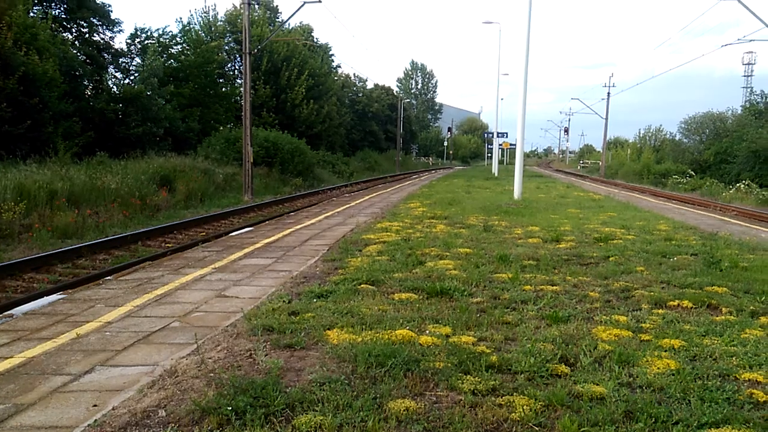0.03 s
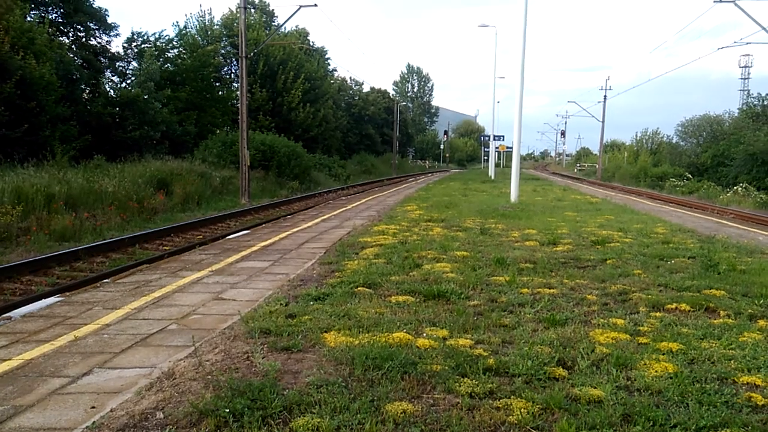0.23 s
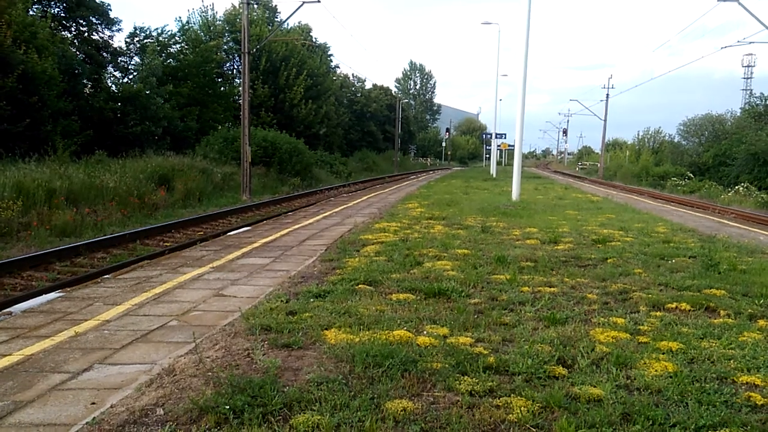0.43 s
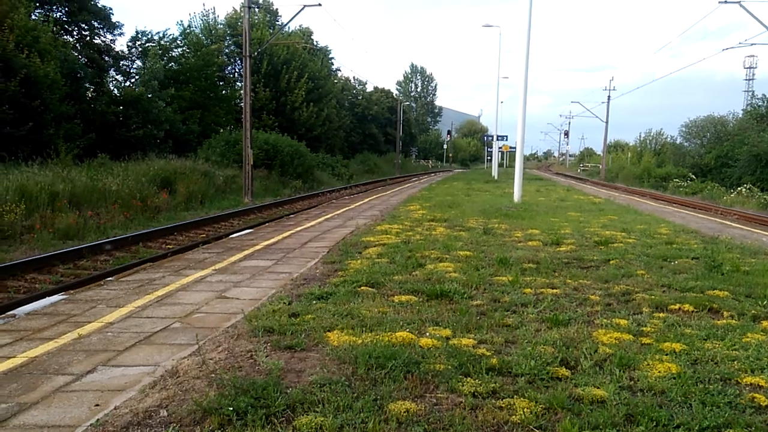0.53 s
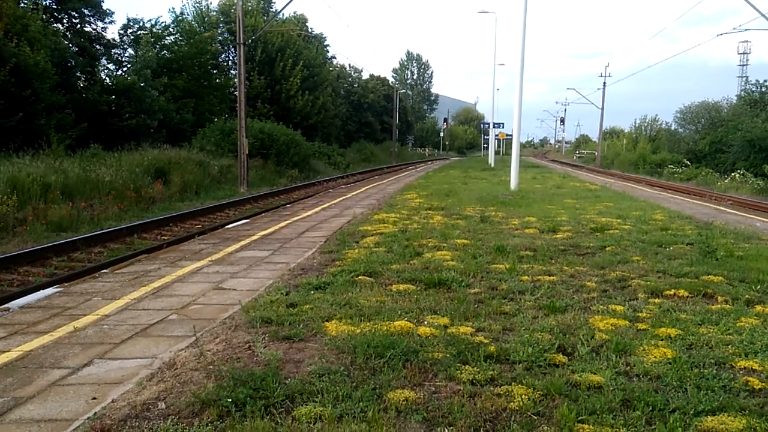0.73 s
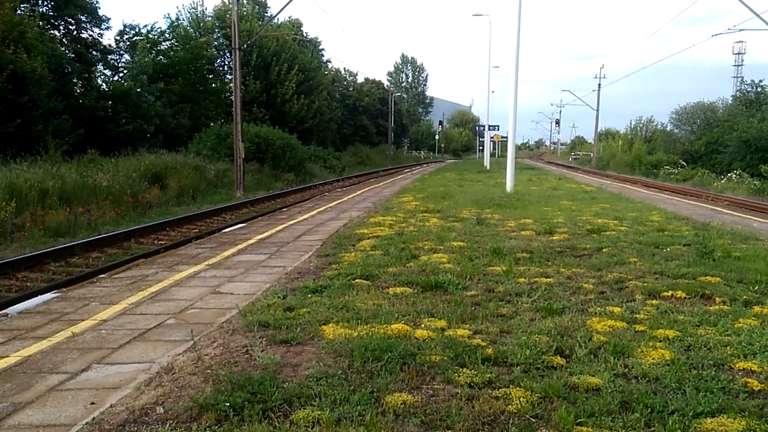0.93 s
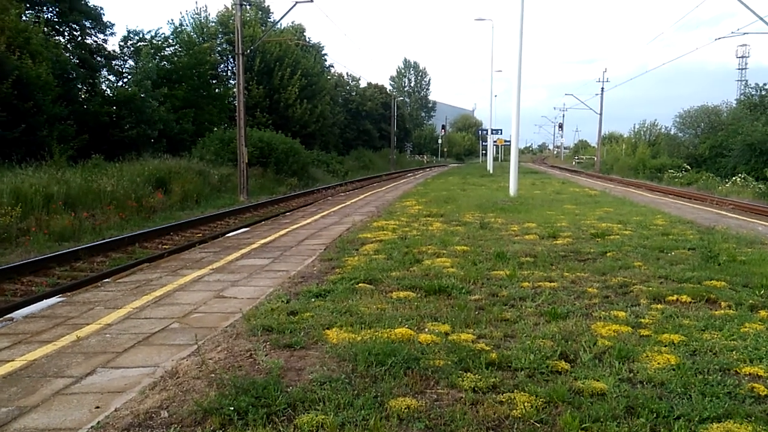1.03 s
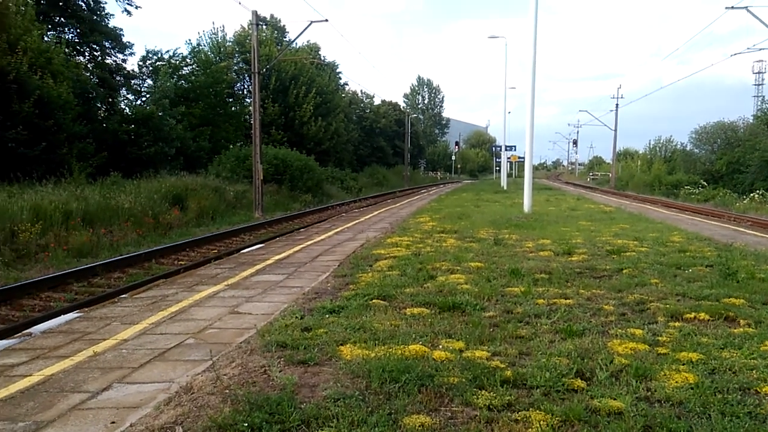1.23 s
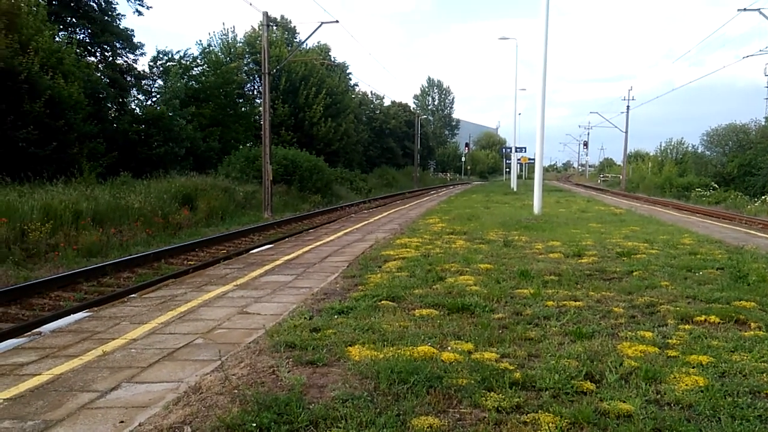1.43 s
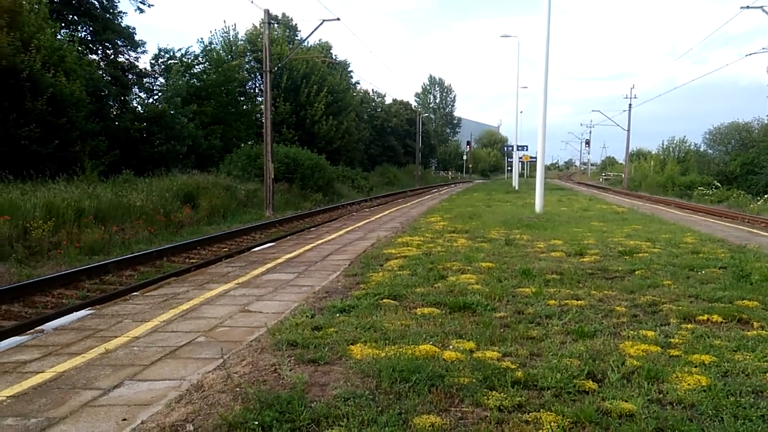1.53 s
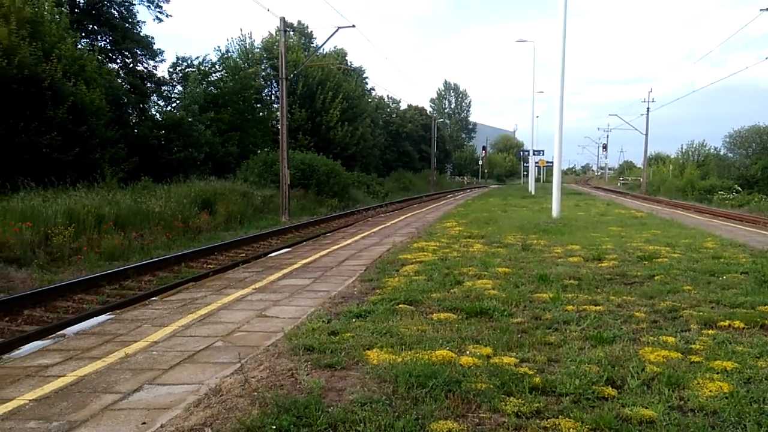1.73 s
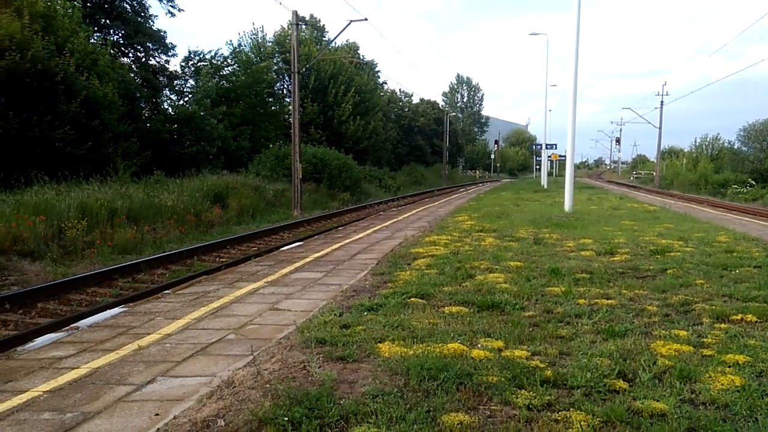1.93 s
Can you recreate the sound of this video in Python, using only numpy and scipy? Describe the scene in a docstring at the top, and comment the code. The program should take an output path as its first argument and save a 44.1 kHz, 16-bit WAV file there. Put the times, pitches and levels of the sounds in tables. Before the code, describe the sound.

From about 0.2 seconds a cricket chirps in rapid, high, scraping pulses, stopping near 1.2 seconds. Light wind buffets the microphone with low, uneven rumbles, easing after 1.5 seconds. Distant insects shrill and small birds give faint, brief whistles over a soft outdoor rush. A few faint ticks sound close by between 1.4 and 1.9 seconds, and another insect's buzz swells just before 2 seconds.

```python
"""On a country railway platform, light wind buffets the microphone over a faint distant rush.
From the start a cricket in the grass scrapes its wings together, fifteen strokes, while other
insects shrill further off and small birds whistle from the trees. The cricket pauses; a few faint
ticks sound close by, the birds call again, and at the very end one insect's buzz swells up."""
import sys
import numpy as np
from scipy import signal
from scipy.fft import rfft, irfft
from scipy.io import wavfile

SR = 44100
rng = np.random.default_rng(int(sys.argv[2]) if len(sys.argv) > 2 else 0)


def put_to_file(sound):
    """Save the sound as 16-bit audio at rate SR, in the file named by the first command-line argument."""
    columns = np.atleast_2d(sound).T  # one column per channel
    safe = np.clip(columns, -1, 1)
    whole_steps = np.round(safe * 32767)
    wavfile.write(sys.argv[1], SR, whole_steps.astype(np.int16))


N = 88200
TIME = np.arange(N) / SR


def from_db(db):
    """Decibels to gain."""
    return 10 ** (np.asarray(db) / 20)


def rms_one(x):
    """Scale to unit rms."""
    return x / np.sqrt(np.mean(x ** 2) + 1e-20)


def gains(rows):
    """One gain curve for each dB column of a table whose rows begin with a time in seconds."""
    times, *columns = np.transpose(rows)
    return [from_db(np.interp(TIME, times, db)) for db in columns]


def colour(x, spectrum):
    """Equalise a sound by rows of frequency in Hz and gain in dB."""
    hz, db = np.transpose(spectrum)
    bin_hz = np.arange(N // 2 + 1) * SR / N
    return irfft(rfft(x) * from_db(np.interp(np.log(bin_hz + 1), np.log(hz), db)), N)


def noise(spectrum):
    """Noise of unit rms with the given spectrum."""
    return rms_one(colour(rng.standard_normal(N), spectrum))


def widen(mid, side):
    """Left and right from a middle and a side signal; only the treble is wide."""
    # Stereo width. Each row: frequency in Hz, side against middle in dB.
    width = [(500, -45), (2600, -38), (4000, -21), (6000, -10), (9000, -7), (14000, -6)]
    return mid + colour(side, width) * np.array([[1], [-1]])


def diffuse(spectrum):
    """Noise that reaches the microphone from all around."""
    return widen(noise(spectrum), noise(spectrum))


def scatter(x, t60):
    """A dying tail from many small reflections, 60 dB down after t60 seconds."""
    tail = rng.standard_normal(N) * from_db(-60 * TIME / t60) * (TIME > .004)
    return signal.fftconvolve(x, tail / np.sqrt(np.sum(tail ** 2)))[:N]


def resonate(x, hz, width_hz):
    """A resonance that passes white noise at unit power."""
    r = np.exp(-np.pi * width_hz / SR)
    feedback = [1, -2 * r * np.cos(2 * np.pi * hz / SR), r * r]
    return signal.lfilter(np.sqrt((1 - r * r) / 2) * np.array([1, 0, -1]), feedback, x)


def linger(energy, time_s):
    """Spread energy over an exponential decay."""
    r = np.exp(-1 / (time_s * SR))
    return signal.lfilter([1 - r], [1, -r], energy + 1e-24)


def air():
    """A distant rush, the hiss of leaves and the microphone's own even hiss."""
    # Background levels. Each row: time in seconds, rush in dB, leaves in dB.
    levels = [(0.22, -69, -75.5), (0.9, -70, -78.5), (1.0, -68, -72), (1.3, -69, -73), (1.46, -69.5, -76.5),
              (1.55, -76.5, -82), (1.66, -81, -95), (1.9, -79, -92), (2.0, -80.5, -80)]
    # Spectra of the rush and the leaves. Each row: frequency in Hz, relative level in dB.
    rush_spectrum = [(100, -8), (300, -0.5), (460, -4), (630, 2.5), (900, -0.5), (1200, -0.5), (1500, -6),
                     (1780, -2.5), (2200, -13), (3000, -24.5), (5000, -22.5), (12000, -56)]
    leaf_spectrum = [(1500, -14), (2400, -0.5), (3500, -4.5), (5400, -1), (7000, -6), (8700, -14),
                     (11500, -19.5), (14000, -21.5)]
    rush, leaves = gains(levels)
    outdoors = rush * noise(rush_spectrum) + leaves * diffuse(leaf_spectrum)
    return outdoors + from_db(-88) * widen(*rng.standard_normal((2, N)))


def ticks():
    """Faint dry ticks close to the microphone, dying within milliseconds."""
    # The ticks. Each row: start in seconds, level in dB.
    onsets = [(1.387, -70), (1.394, -70), (1.832, -63), (1.931, -72), (1.936, -63)]
    # Their spectrum. Each row: frequency in Hz, relative level in dB.
    spectrum = [(200, 0), (900, 2), (1700, 0), (2400, -10), (4000, -5), (7000, -3), (14000, -11)]
    decay_s = .0028
    envelope = sum(from_db(db) * (TIME >= s) * np.exp(-np.abs(TIME - s) / decay_s) for s, db in onsets)
    return diffuse(spectrum) * envelope


def eddies(spectrum, evenness):
    """Low turbulent noise whose own swells are evened out, so that the gusts shape it."""
    turbulence = noise(spectrum)
    envelope = np.abs(signal.hilbert(turbulence))
    return rms_one(turbulence / (envelope + 0.26) ** evenness)


def buffets():
    """A single eddy gives a short push, which the microphone's bass cut turns into a thud."""
    # Eddies striking the microphone. Each row: time in seconds, peak in dB, duration in seconds.
    pushes = [(0.495, -40, .003), (0.524, -38, .004), (0.613, -35.5, .006), (0.677, -40, .003),
              (0.791, -39, .004), (0.92, -44, .004), (1.103, -42, .003), (1.149, -41, .006),
              (1.317, -39, .003), (1.366, -38, .0035), (1.519, -43, .005), (1.702, -44, .004)]
    out = np.zeros(N)
    for s, db, duration in pushes:
        push = np.exp(-np.minimum((2 * (TIME - s) / duration) ** 2, 50))
        thud = resonate(push, hz=75, width_hz=55)
        out -= from_db(db) * thud / np.abs(thud).max()
    return out


def wind():
    """Gusts shake the microphone with a rumble, a quicker flutter and single buffets."""
    # The gusts. Each row: time in seconds, relative levels of rumble and flutter in dB.
    gusts = [(0.22, -52.5, -72.5), (0.318, -50.5, -66), (0.352, -67.5, -80), (0.398, -48, -70.5),
             (0.472, -72, -71.5), (0.496, -40.5, -55), (0.532, -58, -48.5), (0.572, -86, -78),
             (0.616, -36, -52), (0.64, -56, -68.5), (0.67, -58, -48.5), (0.76, -50, -54),
             (0.79, -41, -55.5), (0.908, -56.5, -68.5), (0.928, -52.5, -57.5), (0.968, -56.5, -77),
             (1.008, -48.5, -53.5), (1.076, -59, -80), (1.106, -59, -49.5), (1.156, -48, -60),
             (1.2, -55, -63.5), (1.266, -39.5, -51.5), (1.32, -53.5, -45), (1.434, -46, -59.5),
             (1.458, -56.5, -73), (1.518, -45, -55.5), (1.662, -63, -77), (1.706, -52, -62.5),
             (1.766, -62, -84.5), (1.894, -72, -94), (1.944, -68.5, -74.5), (2.0, -70, -96)]
    # Spectra of the rumble and the flutter. Each row: frequency in Hz, relative level in dB.
    rumble_spectrum = [(15, -42), (30, -17.5), (45, -2), (58, 4), (80, 2.5), (110, -7), (140, -25.5),
                       (250, -63.5), (2000, -110)]
    flutter_spectrum = [(70, -24.5), (110, 0.5), (135, 0), (180, -3.5), (240, -15.5), (330, -25.5),
                        (500, -48.5), (1000, -65), (4000, -100)]
    rumble_gain, flutter_gain = gains(gusts)
    rumble = from_db(-2) * rumble_gain * eddies(rumble_spectrum, evenness=0.48)
    flutter = from_db(1) * flutter_gain * eddies(flutter_spectrum, evenness=.6)
    bass_cut = signal.butter(5, 38, "high", fs=SR, output="sos")
    return signal.sosfilt(bass_cut, rumble + flutter + buffets())


def birds():
    """Each call is a whistle gliding along an arc, blurred by leaves, with a tail from the trees."""
    # The calls. Each row: start and length in seconds, first, middle and last pitch in Hz, level in dB.
    calls = [(0.223, 0.055, 2230, 2186, 2110, -73.5), (0.276, 0.031, 2900, 2824, 2870, -70.5),
             (0.38, 0.18, 2060, 2050, 2010, -78), (0.399, 0.021, 2920, 4010, 3500, -73),
             (0.483, 0.012, 2990, 2690, 2500, -72.5), (0.643, 0.11, 2790, 2770, 2780, -79.5),
             (0.723, 0.054, 2800, 2860, 2980, -73), (0.8883, 0.0028, 5550, 5150, 4900, -50.5),
             (0.944, 0.0073, 2000, 3380, 4000, -68), (0.948, 0.021, 3980, 4154, 4060, -68.5),
             (1.486, 0.068, 7730, 7530, 7370, -70.5), (1.535, 0.016, 7300, 6870, 6550, -72),
             (1.663, 0.059, 7350, 6730, 6840, -72), (1.697, 0.017, 6700, 5980, 5350, -68.5),
             (1.804, 0.022, 2700, 3604, 3580, -71.5), (1.815, 0.028, 3600, 3850, 3470, -61)]
    whistles = np.zeros(N)
    waver = 1 + .016 * noise([(20, 3), (200, -3), (600, -30), (2000, -80)])
    for start, length, first, middle, last, db in calls:
        progress = np.clip((TIME - start) / length, 0, 1)
        arc = np.polyfit([0, .5, 1], [first, middle, last], 2)
        hz = np.polyval(arc, progress) * waver
        envelope = from_db(db) * np.sqrt(2) * np.sin(np.pi * progress)
        whistles += envelope * np.sin(2 * np.pi * np.cumsum(hz) / SR)
    leaves = from_db(-7) * scatter(whistles, t60=0.078)
    trees = from_db(-10) * scatter(whistles, t60=0.39)
    return whistles + leaves + trees


def far_insects():
    """A blurred shrill from the meadow with two thin tones in it; a broader buzz swells out of it."""
    # Levels of the chorus and the swelling insect. Each row: time in seconds, level in dB.
    chorus_level = [(0.22, -67), (0.6, -71.5), (1.1, -71.5), (1.25, -74.5), (1.5, -90), (1.8, -83),
                    (1.92, -77.5), (2.0, -86)]
    swell_level = [(1.91, -95), (1.945, -75), (1.975, -63), (2.0, -57)]
    # Their spectra. Each row: frequency in Hz, relative level in dB.
    chorus_spectrum = [(3800, -17.5), (4600, -24.5), (5400, -15), (6000, -2.5), (6700, -1), (7150, 2.5),
                       (7500, -12), (8700, -19), (14000, -43)]
    swell_spectrum = [(2400, -23.5), (2900, -23), (3300, -6), (4300, -11), (5100, -14.5), (5600, 5),
                      (6200, -2.5), (7500, 1.5), (10000, -6.5), (14000, -13.5)]
    # The thin tones. Each row: pitch in Hz, level in dB while the cricket sings, level in dB afterwards.
    tones = [(6660, -70.5, -100.5), (7014, -79.5, -87)]
    waver_hz, fade_start_s, fade_s = 18.1, 1.07, 0.074
    out = gains(chorus_level)[0] * diffuse(chorus_spectrum)
    out += gains(swell_level)[0] * diffuse(swell_spectrum)
    for hz, early_db, late_db in tones:
        pitch = hz + waver_hz * noise([(30, 8), (300, -37.5)])
        level, = gains([(fade_start_s, early_db), (fade_start_s + fade_s, late_db)])
        out += level * np.sqrt(2) * np.sin(2 * np.pi * np.cumsum(pitch) / SR)
    return out


def tooth_strikes(strokes, teeth=40):
    """In each stroke the scraper runs over the file, pressing harder, then slowing and letting go."""
    start_force, attack_s, hold_s, release_s = 0.77, 0.011, 0.0048, 0.024
    start_teeth_per_s, slowing_s = 850, .03
    gap_jitter, spread_db = 0.098, 1.34
    clicks = np.zeros(N)
    for start, db in strokes:
        age = 0
        for jitter, size in rng.standard_normal((teeth, 2)):
            gap = (1 + age / slowing_s) / start_teeth_per_s
            press = min(1, start_force + (1 - start_force) * age / attack_s)
            release = np.exp(-max(0, age - attack_s - hold_s) / release_s)
            strength = press * release * from_db(db + spread_db * size)
            clicks[int((start + age) * SR)] += strength * np.sqrt(gap * SR)  # power independent of rate
            age += gap * np.exp(gap_jitter * jitter)
    return clicks


def cricket():
    """Tooth strikes, each a short scrape, ring the wing, and the grass scatters a soft tail."""
    # Wing strokes. Each row: start in seconds, relative level in dB.
    strokes = [(0.214, -56), (0.278, -56.5), (0.342, -55.5), (0.404, -55.5), (0.472, -52.5),
               (0.5356, -52.5), (0.595, -52), (0.658, -52.5), (0.7242, -53), (0.7894, -52), (0.853, -51),
               (0.9174, -52), (0.980, -55.5), (1.0464, -54.5), (1.1152, -54.5)]
    # Wing resonances. Each row: frequency and width in Hz, relative level in dB, lead in seconds.
    resonances = [(6070, 800, -9.5, -.002), (6780, 660, 0.5, 0), (7780, 800, -6, .001),
                  (9900, 2500, -15, 0.045), (10900, 1000, -9.5, .006)]
    scrape_share, scrape_s, grass_t60_s, grass_db = .6, 0.0007, .3, -8
    level_db, low_hz, top_hz = -4.5, 4840, 11710
    stroke_times = np.sort([s for s, _ in strokes])
    clicks = tooth_strikes(strokes)
    scrape = linger(clicks ** 2, scrape_s)
    tail = from_db(grass_db) ** 2 * linger(clicks ** 2, grass_t60_s / np.log(1e6))
    # Two channels, middle and side: the clean clicks lie in the middle only.
    noise_gain = np.sqrt(np.array([[scrape_share], [1]]) * scrape + tail)
    clean_clicks = np.sqrt([[1 - scrape_share], [0]]) * clicks
    wing = np.zeros((2, N))
    for hz, width_hz, db, lead_s in resonances:
        drive = noise_gain * rng.standard_normal((2, N)) + clean_clicks
        # The balance of the resonances shifts from stroke to stroke; the upper ones speak first.
        shade_db = np.interp(TIME, stroke_times, rng.standard_normal(len(strokes)))
        ring = np.roll(resonate(drive, hz, width_hz), -int(lead_s * SR), axis=1)
        wing += from_db(db + level_db + shade_db) * ring
    wing = signal.sosfilt(signal.butter(5, low_hz, "high", fs=SR, output="sos"), wing)
    wing = signal.sosfilt(signal.cheby1(10, 1, top_hz, fs=SR, output="sos"), wing)
    return widen(*wing)


def scene():
    """Insects, hiss and ticks spread a little in the treble; wind, rush and birds lie in the middle."""
    return cricket() + far_insects() + wind() + air() + birds() + ticks()


def record(dry):
    """The sound opens out of silence; the highest treble is cut."""
    start_s, fade_s, cutoff_hz = .216, 0.006, 14300
    opened = dry * np.clip((TIME - start_s) / fade_s, 0, 1)
    return signal.sosfilt(signal.ellip(12, .2, 80, cutoff_hz, fs=SR, output="sos"), opened)


dry = scene()
out = record(dry)
put_to_file(out)
```